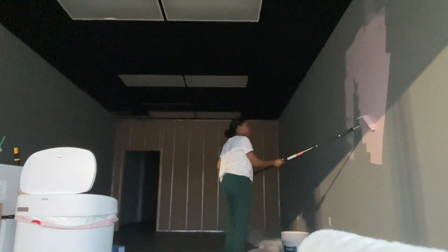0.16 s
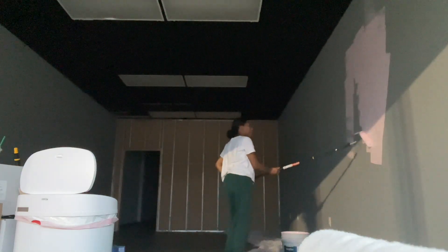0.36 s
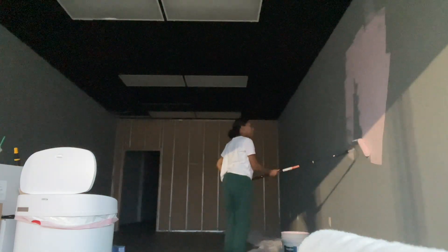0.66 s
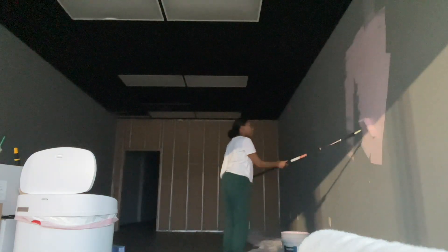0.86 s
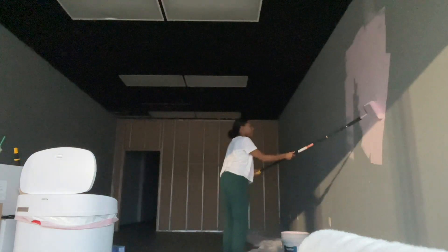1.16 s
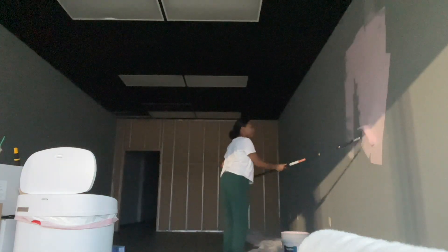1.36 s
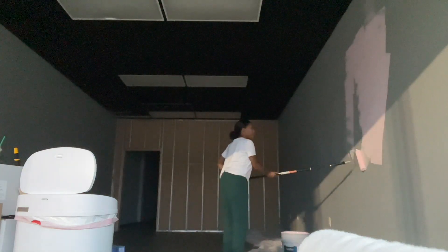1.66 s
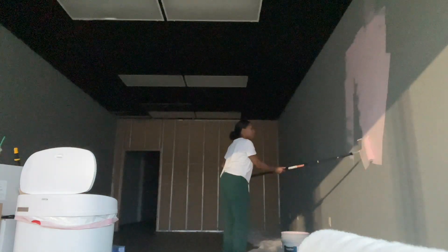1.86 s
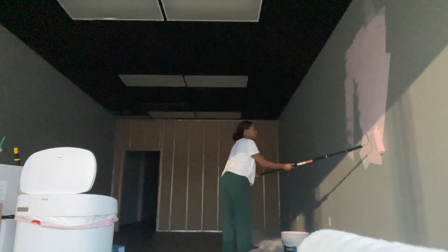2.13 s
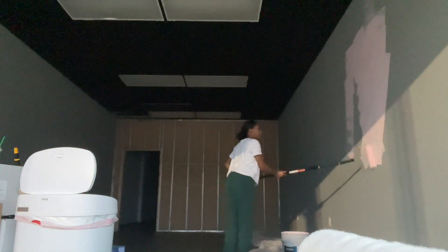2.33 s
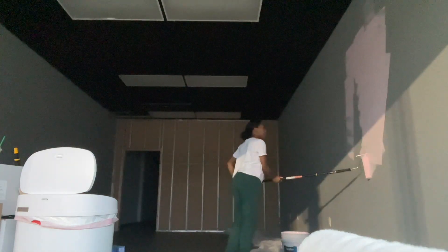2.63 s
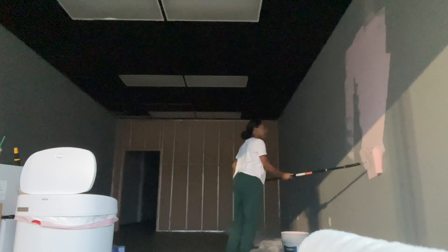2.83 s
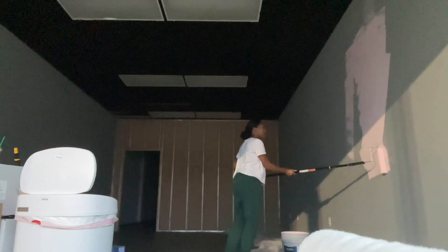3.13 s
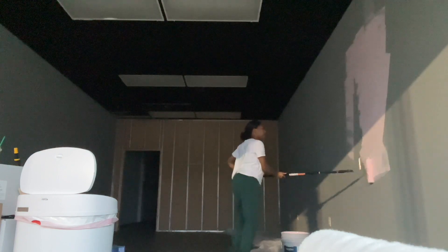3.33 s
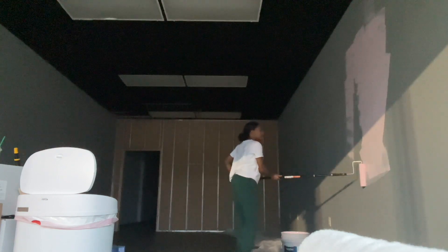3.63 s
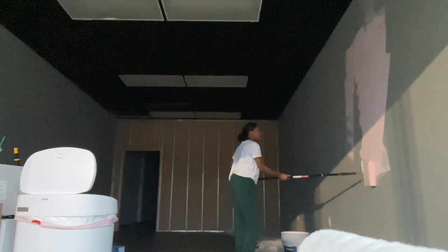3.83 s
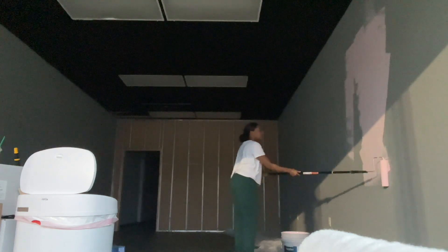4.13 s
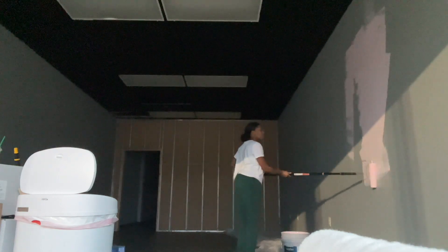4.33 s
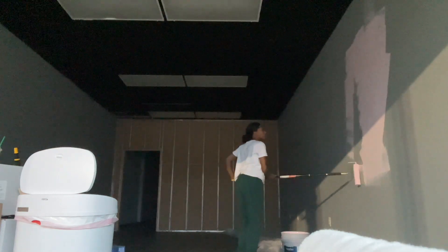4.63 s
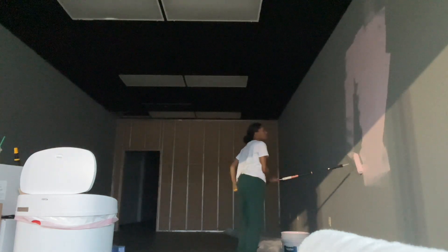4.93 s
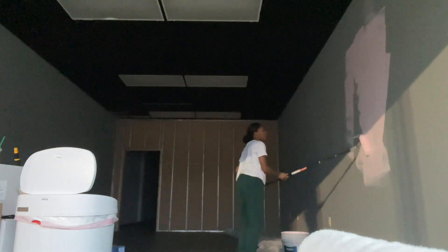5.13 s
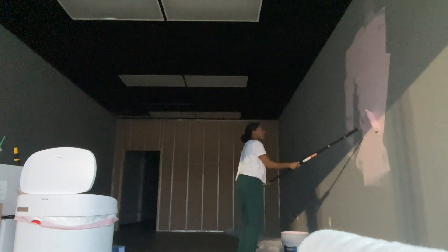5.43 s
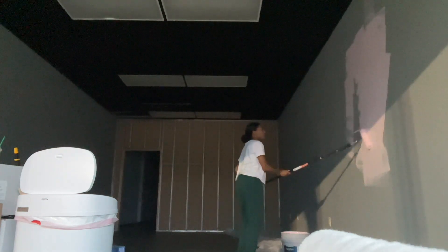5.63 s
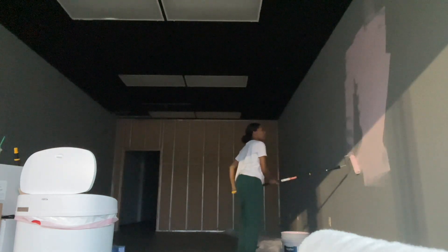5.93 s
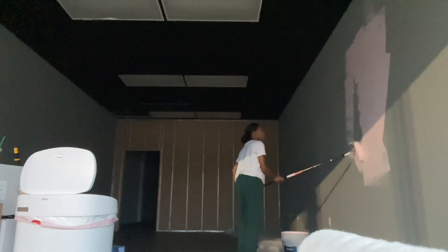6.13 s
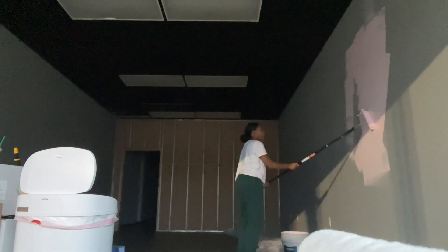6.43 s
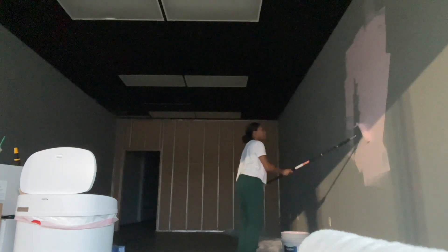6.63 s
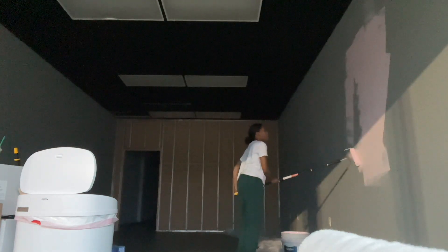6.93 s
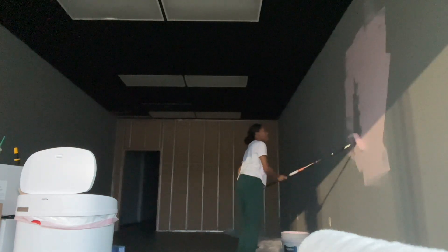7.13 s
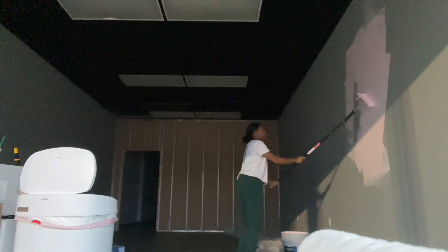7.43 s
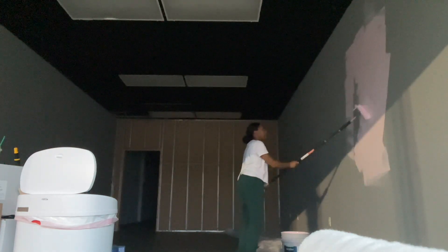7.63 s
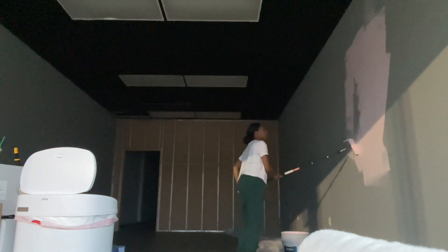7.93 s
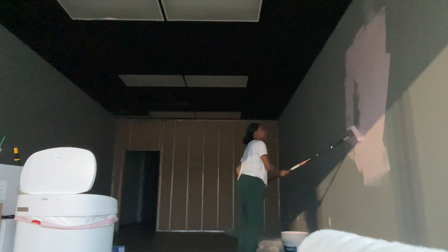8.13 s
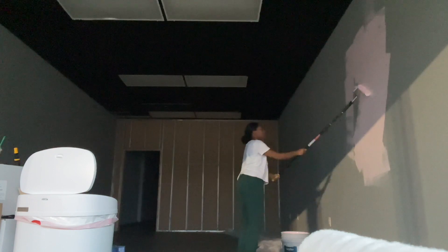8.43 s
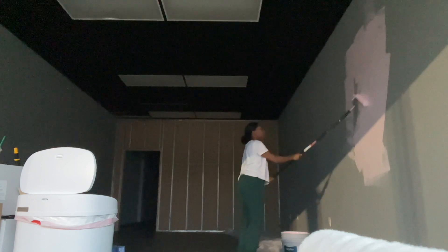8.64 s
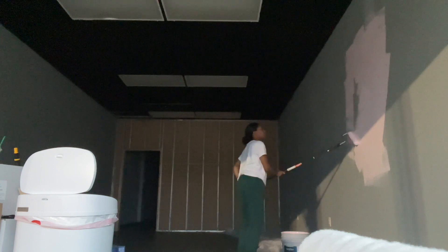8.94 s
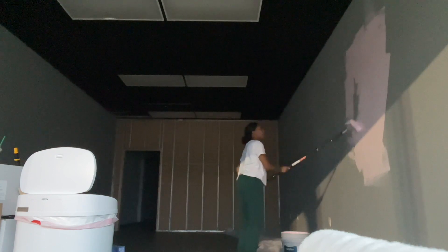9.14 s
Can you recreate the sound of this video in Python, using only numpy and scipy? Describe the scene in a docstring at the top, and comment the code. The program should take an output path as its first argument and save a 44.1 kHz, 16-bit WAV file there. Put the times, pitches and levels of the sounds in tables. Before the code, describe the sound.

Steady low hum and faint air rush fill an empty hard-walled room. Over them, a loaded paint roller strokes a wall back and forth, hissing stickily and rubbing, with small wet smacks at the turns. Its loose cage knocks with short, hollow tube-like double taps. The strokes soften around the middle, then resume with stronger, more regular knocking to the end. Stereo pickup from across the room, with a brief reverberant tail.

```python
"""A bare, long room, where a paint roller on a long pole runs up and down a wall.
Wet paint hisses as its threads snap off the nap, the nap scrubs, and the wall board rumbles under the pressure.
The loose roller cage knocks, mostly in pairs once a turn, and rings the hollow roller tube.
Distant motors hum on close pitches and beat; ventilation rushes faintly; a few scuffs and a dull bump pass by."""
import sys
import numpy as np
from scipy import signal
from scipy.fft import rfft, irfft, next_fast_len
from scipy.io import wavfile
from scipy.ndimage import uniform_filter1d, map_coordinates

SR = 44100
rng = np.random.default_rng(int(sys.argv[2]) if len(sys.argv) > 2 else 0)


def int16_out(signal):
    """Quantize to a 16-bit WAV file."""
    q = np.round(np.clip(np.atleast_2d(signal).T, -1, 1) * 32767)
    wavfile.write(sys.argv[1], SR, q.astype(np.int16))


def boost(x):
    """Linear amplitude factor 10**(x/20) for a level x in decibels (scalar or array-like)."""
    u = np.asarray(x, float) / 20
    return 10 ** u


N = 409236  # length in samples


def unit(x):
    """Scaled to rms 1."""
    return x / np.sqrt(np.mean(x ** 2) + 1e-20)


def along(points, hz):
    """Reads a curve of (Hz, value) points on a log frequency axis."""
    point_hz, value = np.transpose(points)
    return np.interp(np.log(hz + 1), np.log(point_hz + 1), value)


def wobble(rate):
    """A smooth random curve through `rate` random points a second."""
    points = rng.standard_normal(int(N * rate / SR) + 4)
    return map_coordinates(points, [np.arange(N) * rate / SR])


def filtered(x, response):
    """x times a complex response of frequency."""
    m = next_fast_len(N + SR // 2)
    return irfft(rfft(x, m) * response(np.fft.rfftfreq(m, 1 / SR)), m)[..., :N]


def resonant(x, modes, order):
    """x through ringing resonances, `order` times over; a single blow of 1 peaks at 1."""
    def once(f):
        total = 0
        for k, (hz, width, db) in enumerate(modes):
            mode = 1j * f * width / (hz * hz - f * f + 1j * f * width)
            total = total + (-1) ** k * boost(db) * mode  # signs alternate from mode to mode
        return total

    def response(f):
        return once(f) ** order

    single_blow = filtered(np.eye(1, N)[0], response)
    return filtered(x, response) / np.abs(single_blow).max()


def rush(spectrum, grain_db, patchy_db=0):
    """Two unrelated noises, rms 1 together; grain sizes scatter by grain_db, time-pitch patches by patchy_db."""
    grains = rng.standard_normal((2, N)) * boost(grain_db * rng.standard_normal(N))
    z = signal.stft(grains, nperseg=512)[2]
    field = rng.standard_normal(z.shape[1:])
    field = uniform_filter1d(field, size=4, axis=0)  # patches spread over pitch
    field = uniform_filter1d(field, size=6, axis=1)  # and over time
    grains = signal.istft(z * boost(patchy_db * unit(field)), nperseg=512)[1][:, :N]
    return unit(filtered(grains, lambda hz: boost(along(spectrum, hz))))


# One rise time before or one fall time after its top, a swell is down by ENDS_DB times its swing.
ENDS_DB, ROUNDNESS = 12, 2.1  # dB; power of the fall-off


def swells(s, rise_s, fall_s, top_db, swing):
    """Level in dB of overlapping swells, each rising to its top and falling away again."""
    coarse = np.arange(0, N + 64, 64)  # one point every 64 samples
    t = coarse / SR - np.c_[s]
    far = np.where(t < 0, -t / np.c_[rise_s], t / np.c_[fall_s])
    each_db = np.c_[top_db] - swing * ENDS_DB * far ** ROUNDNESS
    power = boost(2 * each_db).sum(0)
    return np.interp(np.arange(N), coarse, 10 * np.log10(power + 1e-12))


# Colour of the air rush. Each row: frequency in Hz, relative level in dB per Hz.
AIR_SPECTRUM = [(20, -39), (45, -2), (62, -1.5), (90, -2), (130, -13.5), (220, -15), (280, -27), (360, -21),
                (450, -33), (990, -36.5), (1450, -43.5), (2100, -32.5), (3000, -42), (3600, -44.5),
                (7000, -55), (8000, -59), (15500, -62)]


def ventilation():
    """Moving air: a steady rush of noise, strongest in the bass."""
    return boost(-44) * rush(AIR_SPECTRUM, grain_db=0)


# Motor tones. Each row: pitch in Hz, rms level in dB, time in seconds when it is in step with the first tone.
MOTOR_TONES = [(58.311, -36.1, 0), (58.055, -43.1, 2.502), (52.179, -48.7, 0.105), (52.954, -54.1, 0.182)]


def motors():
    """Steady tones whose small pitch differences make the hum swell and throb."""
    t, first_hz = np.arange(N) / SR, MOTOR_TONES[0][0]
    hum = np.zeros(N)
    for hz, db, in_step_s in MOTOR_TONES:
        turns = first_hz * t + (hz - first_hz) * (t - in_step_s)
        hum += np.sqrt(2) * boost(db) * np.cos(2 * np.pi * turns)
    return hum


# Light scuffs, brighter than the knocks. Each row: top in seconds, rise in seconds, fall in seconds, level in dB.
SCUFF_TIMES = [(.18, 0.08, 0.08, -53), (1.8, 0.011, 0.035, -53), (4.815, .012, .05, -56)]
# Colour of the scuffs. Each row: frequency in Hz, relative level in dB per Hz.
SCUFF_SPECTRUM = [(1500, -30), (1900, -3), (2200, -4), (2700, -3), (3400, -33)]
# One soft bump. The row: top in seconds, rise in seconds, fall in seconds, level in dB.
BUMP_TIME = [(.078, 0.016, 0.032, -53)]
# Dull colour of the bump. Each row: frequency in Hz, relative level in dB per Hz.
BUMP_SPECTRUM = [(350, -20), (480, 0), (620, -.5), (800, -8), (1000, -39)]


def scuffs():
    """Short swells of noise alongside the strokes: bright scuffs and a dull bump."""
    bright = boost(swells(*np.transpose(SCUFF_TIMES), 1)) * rush(SCUFF_SPECTRUM, grain_db=3.0)
    bump = boost(swells(*np.transpose(BUMP_TIME), 1)) * rush(BUMP_SPECTRUM, grain_db=2.5)
    return bright + bump


# How long the room rings. Each row: frequency in Hz, time in seconds to die away by 60 dB.
ROOM_DECAY = [(150, 1), (900, 0.54), (3000, 0.6)]


def room(x):
    """Two tails, drawn anew every third of a second; each frequency dies at its own speed."""
    out, step = np.zeros((2, N + SR)), SR // 3
    for start in range(0, N, step):
        noise = rng.standard_normal((2, SR // 2))
        hz, t, z = signal.stft(noise, SR, nperseg=256)
        decay = boost(-60 * t / along(ROOM_DECAY, hz)[:, None])
        tail = signal.istft(z * decay, SR, nperseg=256)[1]
        tail = tail / np.linalg.norm(tail[0])
        wet = signal.fftconvolve(x[None, start:start + step], tail, axes=1)
        out[:, start + 400:][:, :wet.shape[1]] += wet  # the tail begins 400 samples late
    return out[:, :N]


# Turns with two knocks. Each row: second knock in seconds, its basic level in dB, how much earlier the first
# knock comes in seconds, its basic level in dB, click over knock in dB, low over high tube mode in dB.
PAIRED_KNOCKS = [(.846, -23, 0.024, -26, -18, 2.5), (.962, -25, 0.027, -32, -14, 2),
                 (1.419, -29, 0.029, -42, -13, 1), (1.833, -24, 0.029, -28, -13.5, 3),
                 (1.947, -29, .023, -31, -17, 7), (2.69, -23, 0.028, -51, -19, 0.5),
                 (2.835, -25, 0.027, -29, -13, 3), (3.178, -35, 0.029, -40.5, -14, -8),
                 (3.806, -22, 0.03, -27.5, -26, 0), (3.921, -34.5, .026, -33, -21, 1),
                 (4.458, -35, 0.023, -44, -20, -12), (5.138, -21.5, .025, -30, -20, 1.5),
                 (5.249, -32, 0.027, -33, -8, -1), (5.654, -34.5, 0.035, -43, -8, -5.5),
                 (5.75, -37, 0.017, -37, -2.5, -7), (5.847, -33.5, 0.021, -32, -8, -1),
                 (6.091, -19, 0.034, -28.5, -17, -1), (6.21, -21.5, 0.028, -27, -16, -0.5),
                 (6.314, -29.5, .027, -28.5, -12, 2), (6.687, -33.5, 0.018, -45, -5, -8),
                 (7.163, -20, 0.025, -27.5, -17, -1.5), (7.261, -24, 0.023, -26.5, -14, 0),
                 (7.354, -42, 0.024, -34, -14, -4), (7.693, -37, .021, -48, -9, -13),
                 (7.782, -31, 0.036, -45, -2.5, -4), (8.109, -22.5, 0.039, -36, -19, -0.5),
                 (8.232, -21.5, 0.023, -26.5, -18, 0), (8.322, -27, .02, -30.5, -21, -3),
                 (8.763, -32, .02, -36, -4, 1.5), (8.857, -26.5, 0.019, -37, -4.5, 0.5),
                 (9.19, -24, .024, -27.5, -15.5, 0)]
# Turns with one knock. Each row: time in seconds, basic level in dB, click over knock in dB,
# low over high tube mode in dB.
SINGLE_KNOCKS = [(.35, -37.5, -17, 1.5), (.498, -37, -19, 5), (.701, -25, -21, 3.5), (1.314, -31, -12, 0),
                 (1.526, -31, -14, -1), (2.217, -46, -10, -11), (2.335, -33.5, -13, -2),
                 (2.941, -39.5, -12, 3), (3.288, -32.5, -13, -5), (3.405, -32.5, -18, -5),
                 (3.708, -47.5, -13, -3), (4.007, -37.5, -13, 0), (4.21, -46, 1, -6), (4.24, -41, -25, -6),
                 (4.349, -33.5, -10, -4), (5.007, -24, -13.5, 1), (5.341, -45, -6, -5),
                 (6.788, -29.5, -2.5, 1), (6.982, -30.5, -17, 1), (7.878, -29.5, -5.5, 4),
                 (8.653, -37.5, -3, 2), (8.819, -37, -8, -1.5)]
# The cage falls back after each turn's last knock: average delay, its scatter, average level against the knock.
REBOUND_S, REBOUND_SCATTER_S, REBOUND_DB = 0.035, 0.005, -17.5


def knocks():
    """Time, basic dB, click dB and tube colour dB of every knock: first, last and rebound of each turn."""
    pairs = np.array(PAIRED_KNOCKS)
    first = np.c_[pairs[:, 0] - pairs[:, 2], pairs[:, 3:]]
    last = np.r_[pairs[:, [0, 1, 4, 5]], SINGLE_KNOCKS]
    scatter = rng.standard_normal((len(last), 4)) * [REBOUND_SCATTER_S, 2.5, 2.5, 2.5]
    rebound = last + [REBOUND_S, REBOUND_DB, -3, 0] + scatter
    return np.r_[first, last, rebound].T


# Ringing of the hollow tube. Each row: frequency in Hz, width in Hz for one of two passes, basic level in dB.
TUBE_MODES = [(692, 418, -8.5), (988, 315, -5.5)]
# Ringing of the click. Each row: frequency in Hz, then width in Hz and relative level in dB for one of two passes.
CLICK_MODES = [(1660, 880, -1.6), (2087, 390, 2.7)]
# Ringing of the wall board. Each row: frequency in Hz, width in Hz, relative level in dB.
BOARD_MODES = [(133, 84, 2), (220, 51, 0), (310, 73, -8.5), (391, 79, -10)]


def cage():
    """Each knock rings the hollow roller tube briefly, clicks and thumps the board; the floor returns the ring."""
    s, db, click_db, low_db = knocks()
    draw = rng.standard_normal((len(s), 5))

    def blows(at, level_db):
        return np.bincount(np.round(at * SR).astype(int), boost(level_db), N)[:N]

    click = resonant(blows(s, db + click_db), CLICK_MODES, order=2)
    thump = resonant(blows(s, db - 12.5 + 3 * draw[:, 2]), BOARD_MODES, order=1)
    dry = click + thump
    floor_s = s + 0.005526 + 0.00036 * draw[:, 0]
    floor_db = -2.5 + 2.44 * draw[:, 1]
    for k, (hz, width, mode_db) in enumerate(TUBE_MODES):
        sign = (-1) ** k
        # no two knocks share the modes alike
        level_db = db + mode_db + sign * low_db / 2 + 1.0 * draw[:, 3 + k]
        hits = blows(s, level_db) - blows(floor_s, level_db + floor_db)
        dry += sign * resonant(hits, [(hz, width, 0)], order=2)
    tails = boost(-4.5) * room(dry)
    return tails + [dry, 0.28 * dry]


# Colour of the board rumble. Each row: frequency in Hz, relative level in dB per Hz.
RUMBLE_SPECTRUM = [(30, -25), (70, 8.5), (100, 5), (220, -5), (400, -10), (500, -29), (900, -36)]


def board_rumble(s, rise_s, fall_s, top_db):
    """The wall board rumbles under the pressure: bass noise that grows with the stroke's speed."""
    level_db = swells(s, rise_s, fall_s, top_db, 0.71)
    return boost(level_db + 2.06 * wobble(25)) * rush(RUMBLE_SPECTRUM, grain_db=0.5)


# Colour of the nap scrub. Each row: frequency in Hz, relative level in dB per Hz.
SCRUB_SPECTRUM = [(450, -6.5), (650, -3), (1000, 0), (1400, -11), (1750, -4), (2140, -1), (3100, -4.5),
                  (3500, -31), (5000, -35)]


def nap_scrub(s, rise_s, fall_s, top_db, uneven):
    """The nap rubs on the wall: coarse-grained noise that grows with the stroke's speed."""
    level_db = swells(s, rise_s, fall_s, top_db, 0.73)
    scrub = rush(SCRUB_SPECTRUM, grain_db=4.5, patchy_db=1.7)
    return boost(level_db + 1.06 * uneven + 1.34 * wobble(90)) * scrub


# Colour of the peeling paint. Each row: frequency in Hz, relative level in dB per Hz.
PEEL_SPECTRUM = [(1800, -37), (3000, -2.5), (3500, -3), (5000, -3), (7000, -2), (8500, -3.5), (11000, -6),
                 (12500, -8), (14500, -5), (15600, -39), (16000, -38)]
# Short wet smacks, mostly as the roller turns round. Each row: top in seconds, basic hiss level in dB.
WET_SMACKS = [(1.165, -58), (1.29, -48.5), (2.19, -57.5), (2.31, -56), (3.26, -60), (4.34, -72),
              (4.44, -60), (4.535, -55), (5.14, -50.5), (5.529, -61.5), (5.635, -54), (5.73, -59),
              (5.84, -50), (6.56, -56.5), (6.67, -52), (7.555, -55), (8.635, -54.5)]
SMACK_RISE_S, SMACK_FALL_S = 0.025, 0.027
# The hiss of the strokes dips briefly. Each row: deepest point in seconds, depth in dB.
HISS_DIPS = [(.26, 1.5), (2.22, 4), (3.31, 6), (4.385, 11), (4.5, 8), (5.61, 10), (5.7, 7), (5.79, 5.5),
             (8.71, 0)]
DIP_S = 0.028  # from the deepest point until the depth is down to 1/e


def paint_hiss(s, rise_s, fall_s, top_db, uneven):
    """Paint threads snap by the thousand as the nap peels off: grainy hiss that grows with the stroke's speed."""
    t = np.arange(N) / SR
    dips_db = sum(depth_db * np.exp(-((t - at) / DIP_S) ** 2) for at, depth_db in HISS_DIPS)
    stroke_gain = boost(swells(s, rise_s, fall_s, top_db, 0.92) - dips_db)
    smack_s, smack_db = np.transpose(WET_SMACKS)
    same = np.ones(len(smack_s))
    smack_gain = boost(swells(smack_s, SMACK_RISE_S * same, SMACK_FALL_S * same, smack_db, 1))
    gain = np.hypot(stroke_gain, smack_gain) * boost(1.04 * uneven + 0.84 * wobble(70))
    return gain * rush(PEEL_SPECTRUM, grain_db=2.5, patchy_db=1.5)


# Strokes, up and down in turn. Each row: fastest moment in seconds, speeding up in seconds, slowing down in
# seconds, then the basic levels at the fastest moment: paint hiss in dB, nap scrub in dB, wall rumble in dB.
ROLLER_STROKES = [(.14, .14, 0.1, -52, -58, -56), (.44, 0.25, 0.14, -52.5, -59, -51.5),
                  (.9, 0.22, 0.2, -48.5, -51, -40.5), (1.43, 0.19, 0.21, -46, -48.5, -46.5),
                  (1.93, 0.18, 0.18, -48, -49.5, -41.5), (2.38, 0.2, 0.16, -52, -51.5, -49.5),
                  (2.84, 0.21, 0.18, -51, -50.5, -41.5), (3.38, 0.24, .22, -53, -53.5, -47.5),
                  (3.86, 0.16, 0.18, -52, -51, -43.5), (4.49, 0.15, 0.16, -58, -57, -49.5),
                  (4.86, 0.12, 0.075, -68, -62, -57), (5.16, 0.17, 0.24, -52.5, -50.5, -42),
                  (5.77, 0.19, .18, -48.5, -51, -45), (6.23, 0.19, 0.25, -49.5, -51, -42),
                  (6.77, 0.18, .2, -48, -51, -45), (7.22, 0.17, 0.24, -48.5, -50, -41),
                  (7.8, 0.19, 0.2, -48, -51.5, -45), (8.25, 0.17, 0.24, -48, -48.5, -40.5),
                  (8.82, 0.19, 0.21, -48.5, -51, -46.5), (9.21, 0.13, 0.27, -50, -52.5, -46)]


def roller():
    """Hiss, scrub and rumble of the same strokes; hiss and scrub share one slow unevenness."""
    s, rise_s, fall_s, hiss_db, scrub_db, rumble_db = np.transpose(ROLLER_STROKES)
    uneven = wobble(19)  # the loaded nap is not quite round
    hiss = paint_hiss(s, rise_s, fall_s, hiss_db, uneven)
    scrub = nap_scrub(s, rise_s, fall_s, scrub_db, uneven)
    return hiss + scrub + board_rumble(s, rise_s, fall_s, rumble_db)


# How alike the two microphones hear. Each row: frequency in Hz, likeness from 0 to 1.
MIC_LIKENESS = [(60, 1), (100, 1), (170, .99), (300, .96), (550, .8), (1000, .88), (1450, .62), (2000, .78),
                (3100, .15), (4500, .5), (5300, .3), (6400, .93), (8500, .72), (11500, .65), (13000, .86),
                (15000, .97)]
# Which one hears first. Each row: frequency in Hz, phase by which left leads in radians.
MIC_LEAD = [(300, 0), (750, -.6), (1800, 1.4), (2700, -.4), (3500, 3.6), (4700, .3), (5300, 1.5),
            (6300, .1), (8000, .6), (11500, 2), (12800, 3.1)]
# Which one hears louder. Each row: frequency in Hz, left over right in dB.
MIC_LEAN = [(90, 0), (500, 3.7), (1100, 0), (1600, 2), (2200, -1.5), (4400, -1.5), (6500, 0)]


def ports(direct, diffuse):
    """Two microphones: a shared sound with lead and lean, and a part of opposite sign in each."""
    def turn(hz):
        return np.arccos(np.clip(along(MIC_LIKENESS, hz), 0, 1)) / 2

    def tilt(hz):
        left = boost(along(MIC_LEAN, hz) / 2) * np.exp(0.5j * along(MIC_LEAD, hz))
        return left ** np.array([[1], [-1]])  # the right gets the inverse

    shared = filtered(direct, lambda hz: np.cos(turn(hz)) * tilt(hz))
    differing = filtered(diffuse, lambda hz: np.sin(turn(hz)) * tilt(hz))
    return shared + differing * [[1], [-1]]


def scene():
    """Everything reaches the two microphones; the hum is the same at both."""
    direct, diffuse = ventilation() + scuffs() + cage() + roller()
    return ports(direct, diffuse) + motors()


def band_limit(x):
    """A steep low-pass at the top of the band."""
    return signal.sosfilt(signal.butter(12, 15800, fs=SR, output="sos"), x)


def record(dry):
    """Takes the finished mix of both microphones."""
    return band_limit(dry)


dry = scene()
out = record(dry)
int16_out(out)
```